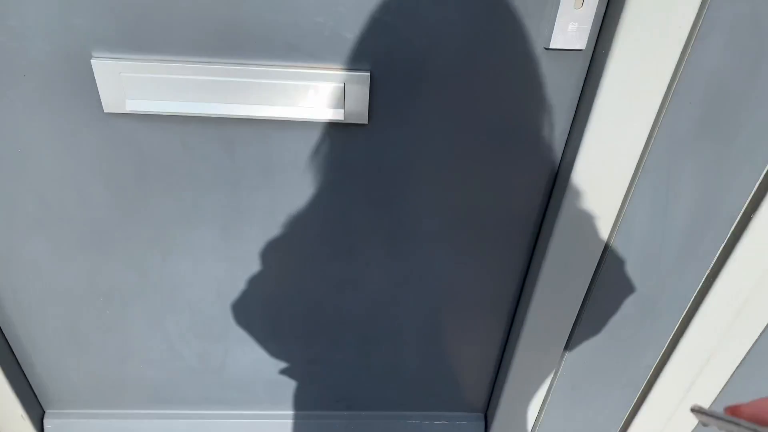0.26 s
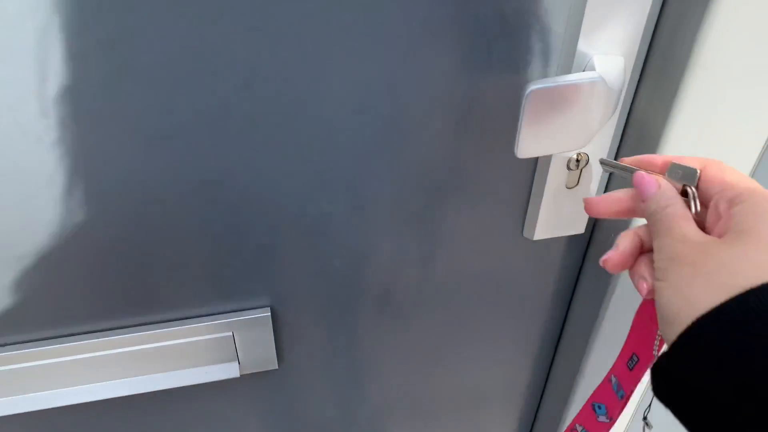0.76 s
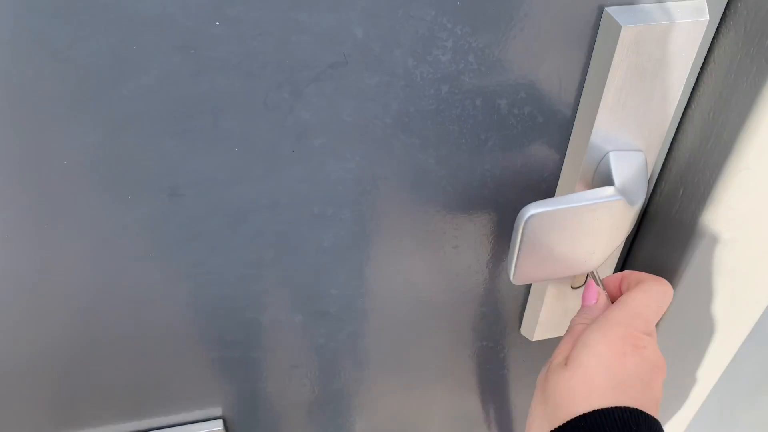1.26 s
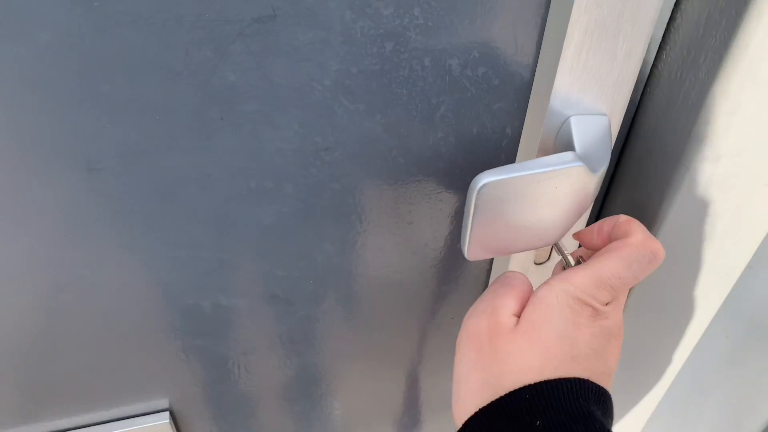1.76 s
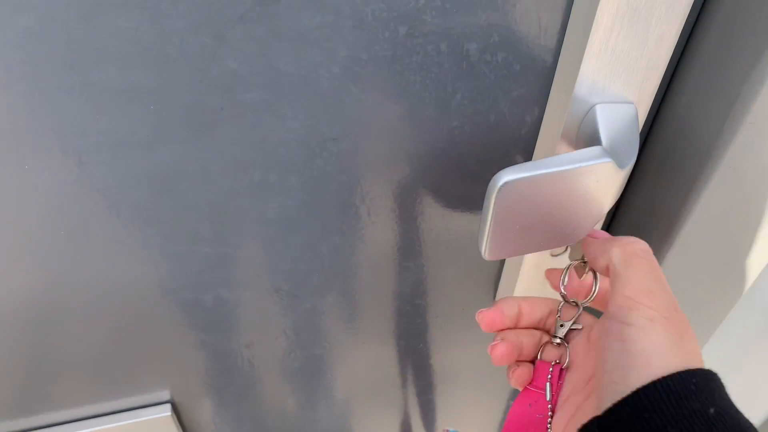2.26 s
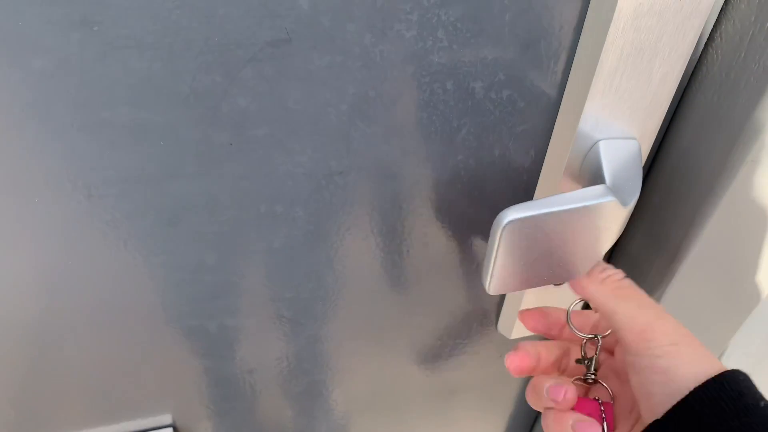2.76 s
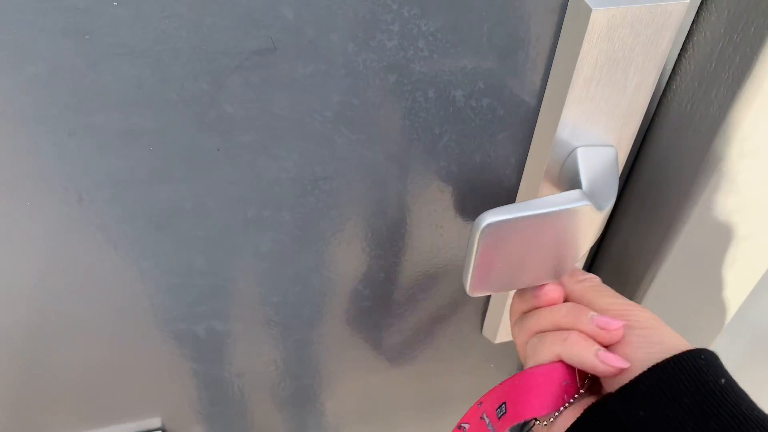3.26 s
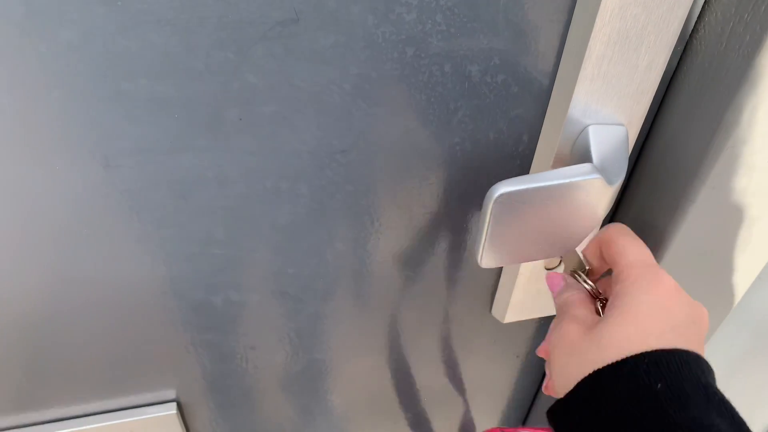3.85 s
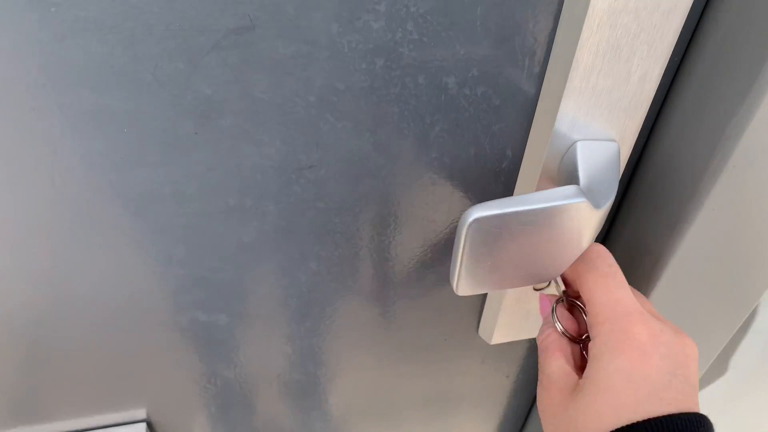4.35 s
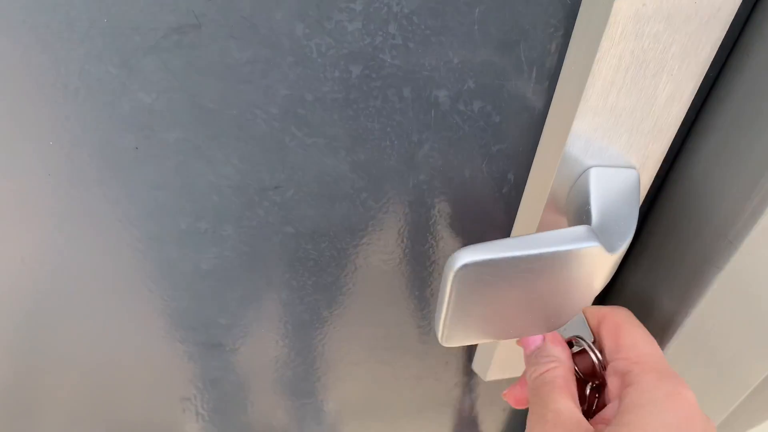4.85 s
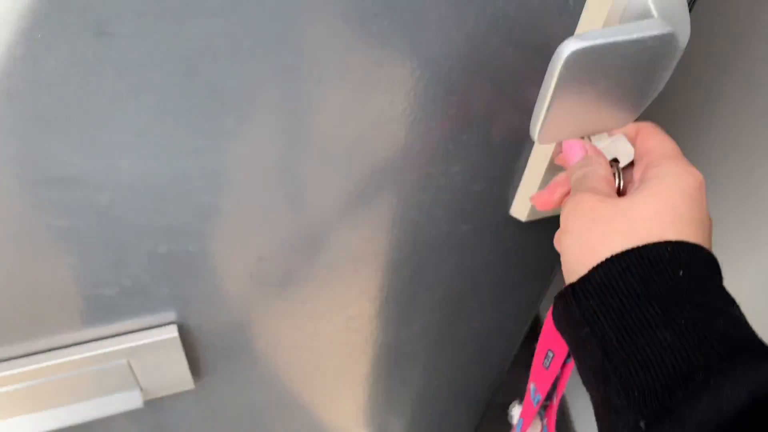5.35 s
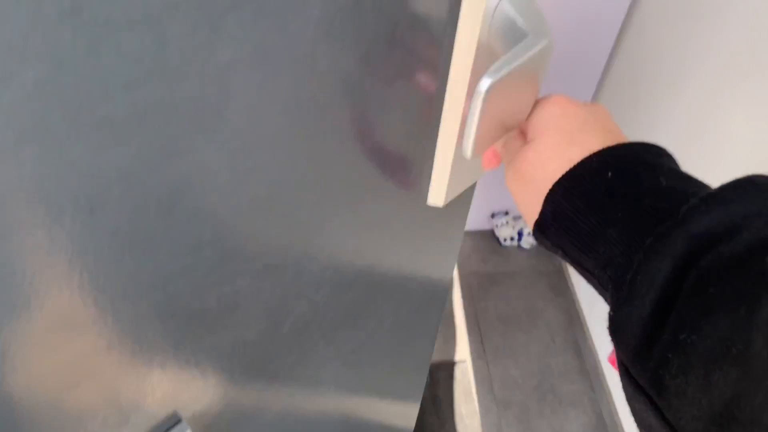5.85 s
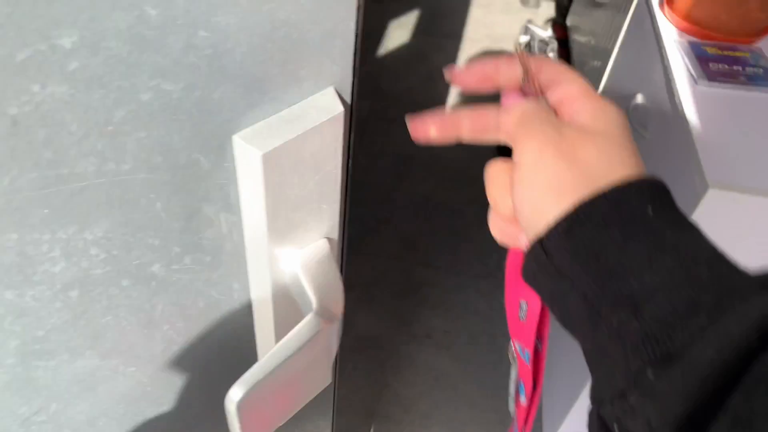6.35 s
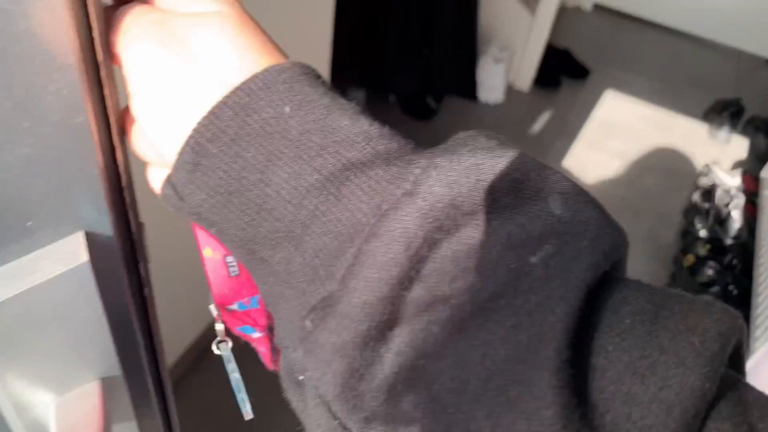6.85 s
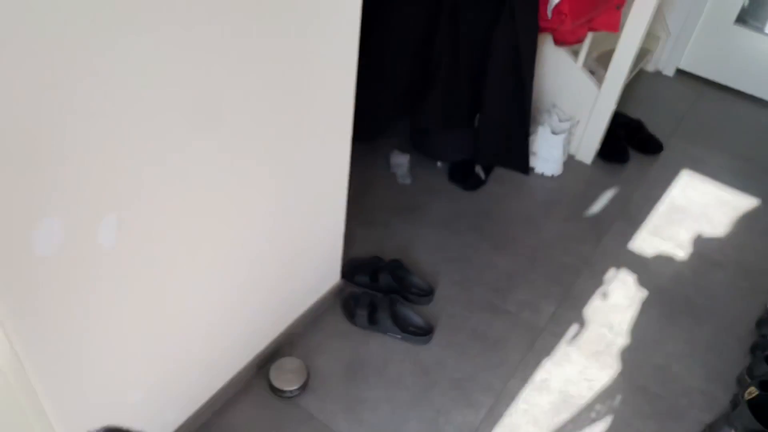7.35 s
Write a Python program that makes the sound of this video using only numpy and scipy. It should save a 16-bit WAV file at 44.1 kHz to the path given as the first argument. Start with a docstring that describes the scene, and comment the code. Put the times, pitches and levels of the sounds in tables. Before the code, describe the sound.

A bunch of keys clinks close to the microphone at about 0.3 seconds, over a faint, steady wash of street noise in a porch. Soft scrapes and a dull bump follow, and around 1 second a key goes into the front door lock with small clicks. From about 2 to 5 seconds it is turned several times: pins and bolt click sharply, the mechanism grinds, the hanging keys jingle brightly and the door gives soft thuds. After a short lull, the latch lets go with a loud metallic clack at 5.7 seconds. Keys rattle at 6 seconds, and the door swings in with a strong, dull knock near 6.2 seconds and softer low thuds after it. The keys jingle once more at 6.5 seconds, with a short echo from the tiled hall. From about 7.3 seconds a deep hum swells briefly to the end.

```python
"""Keys clink on their bunch over faint street noise, close up at a front door. One key goes into the lock
and is turned several times: pins and bolt click, the mechanism grinds, the door leaf thuds. The latch
lets go, the door swings in on a tiled hall, and a deep hum grows at the end.
The microphone is a hand-held phone in the porch, with two ports that ring near 9 kHz."""
import sys
import numpy as np
from scipy import signal
from scipy.fft import rfft, irfft, next_fast_len
from scipy.io import wavfile
from scipy.ndimage import uniform_filter1d

SR = 44100
rng = np.random.default_rng(int(sys.argv[2]) if len(sys.argv) > 2 else 0)


def output_pcm(signal):
    """Save a mono or channel-first signal as 16-bit PCM at the path in sys.argv[1].

    Samples are clipped to [-1, 1] before scaling.
    """
    pcm = np.clip(np.atleast_2d(signal).T, -1, 1) * 32767
    wavfile.write(sys.argv[1], SR, np.round(pcm).astype(np.int16))


N = 334793
DOOR_OPENS_S = 5.6

# metal on metal: t/s, peak level of the keys/dB, brightest f/Hz, lock body against keys/dB, body f/Hz
CLICKS = [(0.2896, -34, 10400, -14.5, 830), (0.2935, -30, 9700, -10, 4030),
          (0.313, -33.5, 6450, -35.5, 560), (0.335, -52, 10700, -22, 522), (0.353, -37, 5300, -23, 554),
          (0.4549, -47, 10700, 3, 1290), (0.715, -51, 10400, -9, 600), (0.767, -60, 10300, 15.5, 1600),
          (0.7855, -43.5, 10200, 15.5, 1090), (0.803, -40.5, 10100, 8.5, 1300),
          (1.051, -36, 6600, -2.5, 977), (1.063, -42, 7000, 6, 1980), (1.083, -32, 9900, 2, 501),
          (1.093, -27, 10300, -10.5, 501), (1.0969, -35.5, 10300, 0.5, 600), (1.232, -45.5, 10300, 3, 1060),
          (1.278, -40.5, 9500, -9, 517), (1.362, -53, 6800, -28, 550), (1.383, -51.5, 6800, 3, 546),
          (1.68, -56, 10500, 11.5, 1490), (1.799, -56, 10500, 3, 2000), (1.8305, -61, 10300, 12, 2000),
          (1.8892, -34.5, 10500, -4, 1030), (1.8938, -33.5, 11600, -4.5, 1020),
          (1.931, -34, 10100, -3.5, 500), (1.9432, -42, 11300, 6, 1000), (1.962, -34.5, 9540, -26, 509),
          (1.9773, -35.5, 10300, -11.5, 501), (1.9953, -28, 11400, -12, 501),
          (2.0116, -20.5, 11940, -14, 501), (2.024, -24.5, 9600, -19, 1020), (2.046, -20, 10040, -9, 1670),
          (2.169, -31, 10630, -21, 606), (2.2467, -38.5, 10400, -24, 501),
          (2.3403, -36.5, 9900, -32.5, 759), (2.364, -31, 10800, -24, 554), (2.3818, -28, 11000, -16, 1020),
          (2.4346, -33.5, 10600, 1, 2540), (2.4454, -34, 11400, -22, 1930), (2.529, -34.5, 9300, 11, 1530),
          (2.5585, -36, 9700, 5.5, 1710), (2.5645, -41.5, 10200, 8, 2100), (2.646, -37, 11500, -14, 999),
          (2.6857, -39, 10500, -8, 802), (2.739, -36.5, 11500, -21, 549), (2.762, -52, 10500, 0, 2900),
          (2.7873, -26.5, 10100, -30.5, 3340), (2.7923, -20.5, 9350, -30, 4030),
          (2.813, -24, 10500, -17.5, 860), (2.831, -41.5, 10000, -20, 4030), (2.848, -38, 10600, -8, 4030),
          (2.8815, -34, 10500, -8, 1040), (2.917, -45.5, 10500, 7, 1300), (2.938, -45.5, 10300, 3.5, 1500),
          (2.957, -44.5, 10300, 8, 1200), (2.991, -45.5, 9500, -10, 2000), (3.0292, -16.5, 9500, -24, 544),
          (3.0455, -36, 9900, -33.5, 958), (3.0893, -34, 6840, -32, 851), (3.1722, -33.5, 11000, -11, 1120),
          (3.2059, -32, 10700, 0.5, 1520), (3.277, -53.5, 10400, 12, 1300),
          (3.3782, -26.5, 9100, -18.5, 589), (3.4463, -26.5, 9270, -43, 643),
          (3.457, -21.5, 9480, -38, 528), (3.485, -18, 9100, -17, 860), (3.503, -29, 11300, -30, 592),
          (3.5196, -22.5, 9600, -24, 1500), (3.538, -41, 6940, -12, 1590),
          (3.562, -24.5, 11300, -15.5, 1600), (3.644, -45.5, 9500, -6.5, 4030),
          (3.7471, -32, 11000, -4.5, 1000), (3.786, -35, 9800, 6, 1500), (3.804, -34.5, 10400, 5, 1200),
          (3.764, -39, 10300, 11, 2400), (3.8216, -29.5, 9800, 1.5, 4030), (3.834, -31.5, 10300, 0, 900),
          (3.841, -32, 10400, 0, 1500), (3.866, -55, 10800, 13, 2300), (3.9092, -33.5, 10400, -25, 1110),
          (3.95, -37, 10430, -3, 1220), (4.072, -29, 10900, -29, 2380), (4.086, -26.5, 11100, -14, 850),
          (4.134, -37, 10500, -16, 501), (4.151, -32, 10200, -12, 1580), (4.2166, -38, 10600, -1, 640),
          (4.24, -45, 10500, 7, 1300), (4.274, -45.5, 10600, 10, 1500), (4.345, -35, 11060, -29, 904),
          (4.4408, -40, 10260, -5, 514), (4.534, -36, 10900, -3, 1040), (4.5427, -25.5, 10400, -25, 2550),
          (4.563, -37, 10700, -21, 2000), (4.583, -33, 10100, -2.5, 523), (4.6613, -26.5, 9580, -5.5, 1550),
          (4.6918, -33, 10200, 7, 2140), (4.7385, -25.5, 9450, 8.5, 1750), (4.857, -53.5, 9400, 4, 2500),
          (4.887, -55, 11370, -21, 1980), (4.903, -35.5, 11500, -9.5, 996),
          (5.153, -53.5, 11200, -18, 2000), (5.355, -49, 9800, -7, 2000), (5.486, -41.5, 9660, -5.5, 501),
          (5.506, -51.5, 10460, 18.5, 537), (5.635, -39, 9440, -16, 501), (5.7081, -12.5, 8650, -0.5, 2270),
          (5.711, -14, 7100, -5.5, 1270), (5.7121, -15, 10000, 1, 3900), (5.879, -40.5, 8550, 8, 1200),
          (5.9262, -37, 8200, 3, 3000), (5.972, -46, 9700, -15, 600), (5.981, -38, 10100, -15, 600),
          (6.001, -25, 10300, -18, 501), (6.0069, -17.5, 11300, -25, 501), (6.013, -19, 10700, -25, 1170),
          (6.02, -26, 10420, -12.5, 1080), (6.0245, -40, 10500, -14, 1000),
          (6.0558, -22, 10140, -12.5, 860), (6.059, -31, 6700, -15, 800), (6.1534, -28, 6570, -45, 568),
          (6.163, -36, 9000, 9, 1030), (6.1689, -36.5, 7000, 10, 3880), (6.171, -32.5, 9300, 6, 1700),
          (6.181, -57, 9300, 3, 1700), (6.203, -53, 9300, 11, 1200), (6.269, -35, 11300, -21, 538),
          (6.31, -39, 6240, -46, 524), (6.329, -36.5, 9400, -37, 600), (6.5141, -15.5, 7050, -16, 3300),
          (6.5254, -19, 7120, -13.5, 4200), (6.536, -22.5, 6170, -13.5, 3240), (6.55, -28, 6860, -18, 4330),
          (6.765, -42.5, 6100, -16, 514)]
# modes of keys and key ring: f/Hz, relative level/dB, relative ring time
KEY_MODES = [(3280, -10.5, 0.86), (4480, -6.5, 0.55), (5490, 5.5, 2.4), (6120, 2, 1.8), (6570, -5.5, 1.8),
             (6800, 7, 1.2), (7350, 12, 1.2), (7430, -1, 0.64), (8200, -5.5, 1.1), (9570, -8.5, 1),
             (9600, -4.5, 0.31), (9270, 6.5, 0.3), (9120, 11, 1.6), (7800, 2, 5.1), (9250, 9.5, 2.1),
             (9840, 12.5, 1.3), (10050, -5, 0.96), (10690, 12.5, 1.06), (11160, 3.5, 1.2), (10590, 1, 1.2),
             (11800, -34, .8)]
# modes of lock case and plate: f/Hz, relative level/dB, t60/s
LOCK_MODES = [(330, -8.5, 0.062), (474.3, -3.5, 0.086), (570, -7, 0.033), (860, -4.5, 0.029),
              (1065, -1.5, 0.025), (1190, -0.5, 0.019), (1483, -6.5, 0.016), (1928, -3, 0.017),
              (2156, -4.5, 0.0083), (2510, -6.5, 0.014), (2970, -11, 0.0097), (3340, -8, 0.0069),
              (4000, -7, 0.015), (5170, -9.5, 0.0051)]


def undb(db):
    """Gain of a level in dB."""
    return 10 ** (np.asarray(db) / 20)


def unit(x):
    """Scale to rms 1."""
    return x / np.sqrt(np.mean(x ** 2))


def decay(t, t60):
    """Envelope that falls 60 dB in t60 seconds."""
    return np.exp(-np.log(1000) * t / t60)


def band(x, hz, *widths_hz):
    """One resonance per width, in series, each with gain 1 at hz."""
    for width_hz in widths_hz:
        x = signal.lfilter(*signal.iirpeak(hz, hz / width_hz, fs=SR), x)
    return x


def spread(mid, side, side_db):
    """Left and right from a common part and a part that differs."""
    return mid + undb(side_db) * side * np.array([[1], [-1]])


def walk(rate):
    """Random levels held 1 / rate s and smoothed twice; spread near 1."""
    hold = int(SR / rate)
    steps = np.repeat(rng.standard_normal(N // hold + 1), hold)
    return 1.96 * uniform_filter1d(uniform_filter1d(steps, hold), hold)[:N]


def add(out, s, sound, db):
    """Lay a sound into the track at time s with the given peak level."""
    i = int(s * SR)
    sound = sound[..., :N - i] / np.abs(sound).max()
    out[:, i:i + sound.shape[-1]] += undb(db) * sound


def wash(bands, flicker_db):
    """Stereo noise bands that each flicker alone."""
    out = 0
    for hz, width_hz, db, side_db in bands:
        noise = band(rng.standard_normal((2, N)), hz, width_hz, 2 * width_hz)
        out = out + undb(db + flicker_db * walk(9)) * spread(*unit(noise), side_db)
    return unit(out)


def street():
    """The street from the porch: drone, traffic, hiss and thin treble, each on its own slow swells."""
    # swells: t/s, then level/dB of deep drone, traffic bass, traffic murmur and hiss
    swells = [(0, -48.5, -48.5, -58, -56), (.3, -52.5, -53.5, -58.5, -56), (.8, -51, -48.5, -55, -61),
              (1.25, -51, -53.5, -57.5, -63), (1.75, -51.5, -56, -61.5, -64),
              (2.0, -44.5, -50.5, -56, -66.5), (2.5, -55.5, -53.5, -64, -60),
              (3.0, -47.5, -55.5, -63, -62.5), (3.8, -50, -54.5, -61, -67), (4.4, -50, -51.5, -60.5, -66.5),
              (4.8, -48, -53, -63, -60.5), (5.1, -58, -55.5, -66.5, -64.5), (5.5, -57, -51, -71, -67),
              (5.8, -54.5, -50.5, -52.5, -48.5), (6.25, -52, -46, -54, -66.5),
              (6.55, -44.5, -52, -58.5, -60.5), (6.9, -45, -52, -46.5, -61), (7.3, -48, -50, -54, -56),
              (7.59, -45.5, -53, -55, -57)]
    # swells of the thin treble: t/s, level/dB
    treble_swells = [(0, -70), (.25, -64), (.6, -72.5), (1, -71.5), (1.8, -79), (2.3, -68), (4.7, -75.5),
                     (5.2, -78), (5.8, -62), (6.4, -69.5), (6.9, -74.5), (7.59, -73)]
    # noise bands of each layer: f/Hz, width/Hz, relative level/dB, side against mid/dB
    drone_bands = [(38, 20, -8, -13), (49, 6, 0, -13), (62, 22, -2, -12)]
    bass_bands = [(95, 49.4, 1, -23), (146.2, 78, 0.25, -21.5)]
    murmur_bands = [(224, 98, 0, -11), (335.5, 85, 0.5, -8), (475, 170, -3.5, -3.5), (546, 100, -9, -2)]
    hiss_bands = [(925, 330, 1.5, 5), (1170, 350, -1, -5), (2006, 1000, 1, 0), (3300, 1900, -4.5, -7),
                  (4720, 1300, -7.5, 2)]
    treble_bands = [(6530, 1100, 2, -20), (8600, 510, 2, -27), (9900, 2000, -3, -23),
                    (10220, 500, 3.5, -21.5)]
    t = np.arange(N) / SR
    times, *levels = np.transpose(swells)
    drone, bass, murmur, hiss = (undb(np.interp(t, times, db)) for db in levels)
    treble = undb(np.interp(t, *np.transpose(treble_swells)))
    return (drone * wash(drone_bands, flicker_db=2.2)
            + bass * wash(bass_bands, flicker_db=2.0)
            + murmur * wash(murmur_bands, flicker_db=2.35)
            + hiss * wash(hiss_bands, flicker_db=2.8)
            + treble * wash(treble_bands, flicker_db=2.3))


def grains(per_s, spread_db):
    """Two independent streams of dense, tiny contacts of uneven size."""
    return np.array([(rng.random(N) < per_s / SR) * rng.standard_normal(N)
                     * undb(spread_db * rng.exponential(size=N)) for _ in range(2)])


def rattle(times, db, t60):
    """Gain that jumps at each of the times and dies away."""
    kicks = np.zeros(N)
    kicks[(times * SR).astype(int)] = undb(db)
    return signal.lfilter([1], [1, -decay(1 / SR, t60)], kicks)


def lock_grind(slips):
    """Stick-slip grains ring the lock case; the contact point wanders, so every mode comes and goes."""
    modes = sum(undb(db + 2.46 * walk(45)) * (-1) ** k * band(slips, hz, 7.2 / t60) / np.sqrt(hz)
                for k, (hz, db, t60) in enumerate(LOCK_MODES))
    high_grit = band(slips, 4200, 3700)
    low_grit = band(band(slips, 1400, 1799), 1200, 2600)
    return unit(unit(modes) + undb(-13) * unit(high_grit) + undb(-7.5) * unit(low_grit))


def key_rustle(touches):
    """Small touches ring the keys of the bunch and add their own bare sizzle."""
    modes = sum(undb(db + 4.1 * walk(40)) * (-1) ** k * band(touches, hz, 190 / ring_time)
                for k, (hz, db, ring_time) in enumerate(KEY_MODES))
    sizzle = band(band(touches, 10430, 2500), 10500, 3500)
    return unit(unit(modes) + undb(-6) * unit(sizzle))


def rubs():
    """Lock and bunch grind and rustle with each stroke of the hand, and rattle on after each click."""
    # strokes of hand and key: strongest t/s, swell/s, fade/s, grind level/dB, rustle level/dB
    # swell and fade are times per 20 dB, held to at least 1 ms
    strokes = [(0.295, 0.02, 0.02, -55, -41), (0.345, 0.02, 0.0161, -63, -42.5),
               (.26, 0.27, -0.12, -55, -64), (.385, 0.12, .01, -54, -62), (.45, -0.07, 0.08, -67, -55.5),
               (0.769, 0.1, 0.04, -52.5, -68), (0.801, 0.03, 0.01, -50, -48),
               (0.835, 0.03, -0.01, -68, -42.5), (0.857, 0.06, 0.04, -51.5, -56),
               (1.053, 0, 0.16, -58, -75), (1.094, 0, 0.2, -78, -73), (1.298, 0.07, 0.23, -64, -72),
               (2.052, 0.21, 0.01, -50, -58), (2.181, -0.07, 0.32, -68, -56.5),
               (2.392, -0.07, 0.14, -51, -47.5), (2.444, -0.08, 0.17, -49, -50),
               (2.526, 0.0147, 0.04, -46.5, -55), (2.556, 0.0026, 0.04, -36.5, -39.5),
               (2.854, -0.08, 0.02, -62, -45), (2.933, 0.07, 0.04, -40, -45),
               (2.963, 0.05, 0.04, -44.5, -48), (3.1, 0.1, 0.37, -63.5, -54),
               (3.205, -0.03, 0.16, -48.5, -49.5), (3.291, 0.03, 0.09, -55.5, -75.5),
               (3.382, -0.02, 0.03, -71.5, -41.5), (3.42, -0.03, 0.05, -53.5, -55),
               (3.487, .004, 0.08, -43, -48), (3.555, 0.0262, 0.06, -46.5, -41),
               (3.754, -0.01, 0.1344, -40.5, -47.5), (3.829, -0.0169, .04, -42.5, -39),
               (3.867, 0.0546, 0.03, -46, -72), (3.954, 0, 0.1, -65, -73), (4.134, .004, 0.35, -54, -56),
               (4.21, 0.07, 0.08, -52, -62), (4.272, 0.04, 0.04, -44.5, -58), (4.34, 0.1, 0.04, -68, -65),
               (4.576, 0.05, 0.15, -55, -53), (4.668, -0.0337, 0.04, -39.5, -53),
               (4.696, -0.0051, 0.01, -47, -47), (4.877, 0.1, 0.16, -59, -64),
               (4.953, .004, 0.04, -76, -51), (5.584, 0.13, 0.22, -57, -78),
               (5.703, 0.05, -0.04, -45, -48.5), (5.73, 0.0354, 0.0544, -40.5, -44),
               (5.882, 0.06, .07, -54, -65), (5.929, 0.03, 0.08, -55, -60), (5.99, 0.05, -0.03, -58, -49),
               (6.056, 0.11, -0.1, -62, -56), (6.19, -0.01, 0.06, -46.5, -54),
               (6.32, 0.13, -0.09, -61.5, -52), (6.57, -0.02, 0.2, -58, -55),
               (6.657, 0.04, 0.1, -52.5, -57), (6.789, 0, 0.02, -59.5, -57)]
    t = np.arange(N) / SR
    click_s, click_db, _, body_db, _ = np.transpose(CLICKS)
    grind_gain = rattle(click_s, click_db + body_db - 19, t60=0.055)
    rustle_gain = rattle(click_s, click_db - 18.5, t60=0.079)
    for s, swell, fade, grind_db, rustle_db in strokes:
        stroke = undb(20 * np.where(t < s, (t - s) / max(swell, 1e-3), (s - t) / max(fade, 1e-3)))
        grind_gain += undb(grind_db) * stroke
        rustle_gain += undb(rustle_db) * stroke
    slips = grains(per_s=2400, spread_db=2.0)
    touches = spread(*grains(per_s=2200, spread_db=1.6), -10)
    grind = spread(*lock_grind(slips), -11.5)
    rustle = key_rustle(touches)
    uneven_db = 1.4
    return (grind_gain * undb(uneven_db * walk(60)) * grind
            + rustle_gain * undb(uneven_db * walk(81)) * rustle)


def chatter(length_s, bounce_db=-21):
    """A contact that builds and lets go within a few lengths, then rattles out in small bounces."""
    lengths = np.arange(SR // 16) / SR / length_s
    push = lengths ** 2 * np.exp(-lengths ** 2 / 2)
    bounces = undb(bounce_db) * np.minimum(lengths, 1) * np.exp(-lengths / 12)
    noise, size = rng.standard_normal((2, len(lengths)))
    return noise * np.abs(size) * (push + bounces)


def ring(hz, gain, t60, t, detuning=0.013, rise_s=0.00046):
    """Decaying modes; every blow lands elsewhere, so sizes, phases and pitches scatter."""
    size, phase, detune = rng.standard_normal((3, len(hz)))
    cycles = np.outer(hz * (1 + detuning * detune), t) + phase[:, None]
    waves = np.sin(2 * np.pi * cycles) * decay(t, t60[:, None])
    return (gain * undb(1.8 * size)) @ waves * (1 - np.exp(-t / rise_s))


def struck_keys(hz, t):
    """The bunch rings; the struck key, near hz, sounds most and longest."""
    key_hz, key_db, ring_time = np.transpose(KEY_MODES)
    base_t60 = 0.0068 * np.exp(0.2 * rng.standard_normal())  # some keys hang freer than others
    near = np.exp(-(np.log(key_hz / hz) / 0.043) ** 2)
    return ring(key_hz, undb(key_db) * (0.45 + near), max(base_t60, 0.002) * ring_time * (0.17 + near), t)


def lock_case(hz, contact_s, t):
    """The case crunches, most near hz; its plate is wide, so the modes reach the two ports differently."""
    lock_hz, lock_db, t60 = np.transpose(LOCK_MODES)
    near = np.exp(-(np.log(lock_hz / hz) / 0.43) ** 2)
    gain = undb(lock_db) * (0.5 + near)
    mid, side = (signal.fftconvolve(ring(lock_hz, gain, t60, t), chatter(contact_s)) for _ in range(2))
    return spread(mid, side, -7.5)


def handle():
    """Handle and face plate ring on after a blow."""
    # their modes: f/Hz, relative level/dB, t60/s
    modes = [(2230, -5.5, 0.088), (2650, -7, .1), (2780, -6, .13), (3060, -2, 0.091), (3420, -5, .11),
             (3550, -5, .1), (3800, -3, .11), (4250, -6, 0.12), (4650, -7, .14), (4630, -9.5, .12),
             (5570, -9.5, .1)]
    hz, db, t60 = np.transpose(modes)
    t = np.arange(SR // 6) / SR
    mid, side = (ring(hz, undb(db), t60, t, detuning=0.0059) for _ in range(2))
    return spread(mid, side, 0) * np.minimum(t / 0.0028, 1)


def clicks(contact_s=0.00069):
    """Each contact of metal on metal cracks and sets keys, lock case and handle ringing."""
    out, t = np.zeros((2, N)), np.arange(SR // 8) / SR
    for s, db, hz, body_db, body_hz in CLICKS:
        lock_db = db + body_db
        shut_db = -14.5 if s < DOOR_OPENS_S else 0  # lower while the frame holds the door
        push = chatter(contact_s)
        add(out, s, signal.fftconvolve(struck_keys(hz, t), push), db)
        add(out, s, lock_case(body_hz, 2.86 * contact_s, t), lock_db - 3)
        add(out, s, handle(), lock_db - 10 + shut_db)
        knock = band(push, body_hz, 1.1 * body_hz, 1.6 * body_hz)
        add(out, s, knock, lock_db - 4.5)
        crack = band(push, 8500, 9000, 12000)
        add(out, s, crack, db - 15.5)
        short_key_modes = band(spread(push, chatter(contact_s), -7), hz, 1900, 3500)
        add(out, s, short_key_modes, db - 2)
    return out


def pings():
    """A free-hanging key or ring is brushed: one clear pitch, beating with a close, weaker partner."""
    # brushes: t/s, peak level/dB, f/Hz, t60/s
    brushes = [(.2925, -42, 9870, .02), (0.309, -41.5, 9550, 0.08), (.327, -43, 6280, 0.072),
               (0.332, -40, 10850, 0.064), (0.335, -37, 5310, 0.061), (.346, -46, 4870, .04),
               (.352, -50, 6300, .04), (3.182, -40.5, 1170, 0.043), (3.472, -34, 9140, 0.06),
               (3.484, -31, 11100, 0.037), (3.503, -52, 6960, 0.042), (3.536, -41, 6950, 0.11),
               (3.575, -36, 9560, 0.037), (6.151, -30, 10800, 0.045), (6.265, -29, 8930, 0.055),
               (6.264, -40, 7060, 0.048), (6.274, -33.5, 10800, 0.059), (6.309, -46, 6190, .04),
               (6.512, -30.5, 10850, 0.044), (6.516, -37, 6190, .08), (6.551, -27, 7450, 0.022),
               (6.76, -50, 6160, 0.056)]
    out, t = np.zeros((2, N)), np.arange(SR // 5) / SR
    for s, db, hz, t60 in brushes:
        tone = ring(hz * np.array([1, 1.012]), undb([0, -7]), np.full(2, t60), t, detuning=0.0026)
        add(out, s, signal.fftconvolve(tone, chatter(0.0013, bounce_db=-16)), db)
    return out


def door_thuds(rise_s=0.0062):
    """A soft push swells and dies in a low mode of the door leaf; its neighbours shudder roughly."""
    # dull blows through door leaf and hand: t/s, peak level/dB, f/Hz, t60/s
    blows = [(0.669, -37.5, 317, 0.077), (0.787, -26, 174, 0.04), (0.799, -29.5, 53.3, 0.09),
             (1.089, -35.5, 372, 0.1), (1.314, -33, 72.4, 0.081), (1.384, -29.5, 103.7, 0.25),
             (1.899, -36, 56.7, 0.33), (2.017, -32.5, 79.4, 0.22), (2.049, -37.5, 105, 0.059),
             (2.06, -40, 47, 0.18), (3.746, -42.5, 58.7, 0.064), (4.417, -34.5, 505, 0.084),
             (4.686, -32, 149.8, 0.23), (5.512, -28.5, 178, 0.031), (5.527, -27, 61, 0.2),
             (5.704, -30.5, 466, 0.027), (5.71, -33, 131, 0.1), (5.878, -32, 115, 0.15),
             (5.99, -31.5, 96.3, 0.27), (6.164, -22, 414, 0.045), (6.17, -11.5, 337, 0.041),
             (6.182, -24, 340, .05), (6.18, -31, 480, 0.09), (6.21, -30, 294, 0.2),
             (6.199, -19.5, 174, 0.038), (6.23, -26.5, 162, 0.035), (6.258, -28, 80, 0.15),
             (6.301, -29.5, 68, 0.041), (6.415, -29, 116, 0.11), (6.431, -21.5, 88, 0.15),
             (6.491, -34, 51.2, 0.28), (6.622, -37, 67, 0.19), (6.72, -33, 58, 0.22)]
    out, t = np.zeros((2, N)), np.arange(SR // 3) / SR
    for s, db, hz, t60 in blows:
        envelope = (1 - np.exp(-t / rise_s)) ** 2 * decay(t, t60)
        shudder, side = unit(band(rng.standard_normal((2, len(t))), hz, 0.6 * hz, 1.1 * hz))
        leaf = np.sin(2 * np.pi * hz * t) + 0.65 * shudder
        add(out, s, envelope * spread(leaf, side, -12.5), db)
    return out


def reflect(x, echo):
    """Pass a sound through a stereo echo scaled to unit energy at each port."""
    echo = echo / np.sqrt(np.sum(echo ** 2, axis=1, keepdims=True))
    return signal.fftconvolve(x, echo, axes=1)[:, :N]


def porch(x, t60=0.077, wet_db=-13):
    """Direct sound plus quick, dull reflections off the nearby door, frame and walls."""
    t = np.arange(SR // 4) / SR
    echo = band(rng.standard_normal((2, len(t))), 1500, 3000, 3000) * decay(t, t60)
    return x + undb(wet_db) * reflect(x, echo)


def hall(x, t60=0.31, wet_db=-12):
    """Once the door stands open, the tiled hall behind it answers with a brighter, longer tail."""
    t = np.arange(SR // 2) / SR
    mid, side = band(rng.standard_normal((2, len(t))), 3900, 6000)
    echo = spread(mid, band(side, 2500, 4000, 4000), 1.5) * decay(t, t60)
    door_open = np.arange(N) / SR > DOOR_OPENS_S
    return undb(wet_db) * reflect(x * door_open, echo)


def hum(start_s=7.255, start_hz=44.5, start_db=-52, climb_hz_per_s=10, swell_db_per_s=61):
    """One low tone that grows and climbs as the microphone enters the hall."""
    since = np.arange(N) / SR - start_s
    hz = start_hz + climb_hz_per_s * np.maximum(since, 0)
    rms = (since > 0) * undb(start_db + swell_db_per_s * since)
    return np.sqrt(2) * rms * np.sin(2 * np.pi * np.cumsum(hz) / SR)


def scene():
    """Lock, keys and door between porch and hall, over the street."""
    metal = clicks() + pings() + rubs()
    return porch(metal + door_thuds()) + hall(metal) + street() + hum()


def record(dry):
    """The phone's ports colour the treble, the left one lags in phase, and the top is cut."""
    # peak and dips of both ports: f/Hz, width/Hz, gain/dB
    port_colour = [(8900, 780, 2), (5260, 1600, -1), (12700, 670, -9.5)]
    # lag of the left port behind the right: f/Hz, phase/rad
    port_lag = [(0, 0), (2000, 0), (3200, .4), (4600, .2), (5300, 3.1), (6300, 6.6), (6900, 7.2),
                (7800, 9.2), (8900, 9.6), (10300, 12.2), (11000, 12.5), (11500, 12.8), (12300, 14.6)]
    for hz, width_hz, db in port_colour:
        dry = dry + (undb(db) - 1) * band(dry, hz, width_hz)
    left, right = dry
    t, size = np.arange(N) / SR, next_fast_len(N + SR // 10)
    lag = np.interp(np.arange(size // 2 + 1) * SR / size, *np.transpose(port_lag))
    lagged = irfft(rfft(left, size) * np.exp(-1j * lag), size)[:N]
    # for a moment the phone faces the lock squarely and the lag is gone
    facing = np.interp(t, [5.69, 5.70, 5.86, 5.87], [0, 1, 1, 0])
    left = lagged + facing * (left - lagged)
    left = left + (undb(1.8) - 1) * band(left, 500, 1200)  # the left port hears more low mids
    softened = [signal.sosfilt(signal.butter(9, hz, fs=SR, output="sos"), port)
                for port, hz in ((left, 11500), (right, 11300))]
    top_cut = signal.ellip(10, 0.3, 80, 12300, fs=SR, output="sos")
    return signal.sosfilt(top_cut, softened)


dry = scene()
out = record(dry)
output_pcm(out)
```